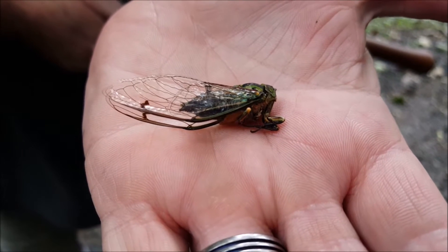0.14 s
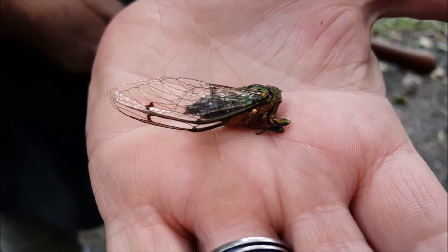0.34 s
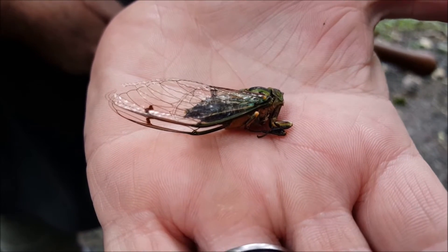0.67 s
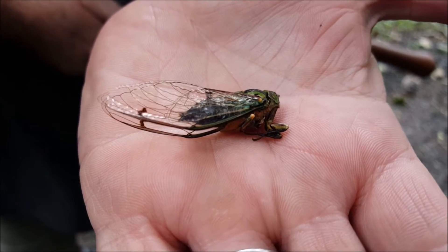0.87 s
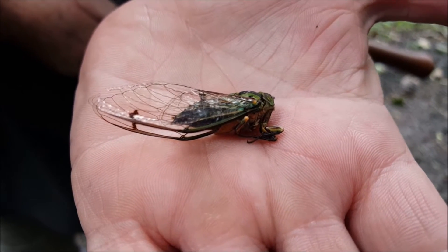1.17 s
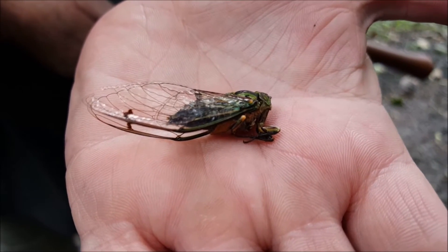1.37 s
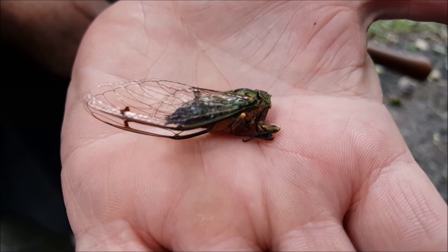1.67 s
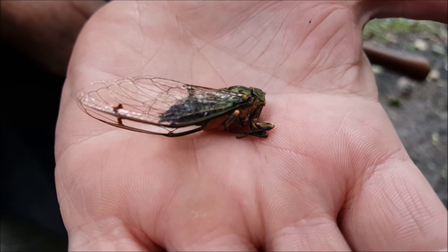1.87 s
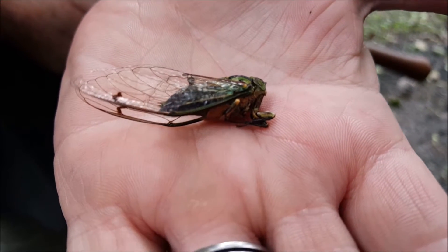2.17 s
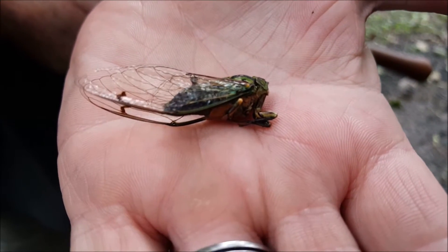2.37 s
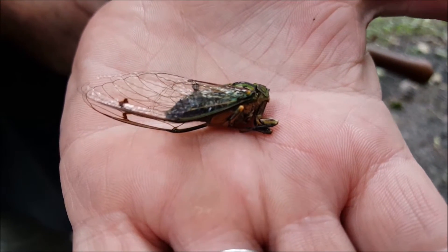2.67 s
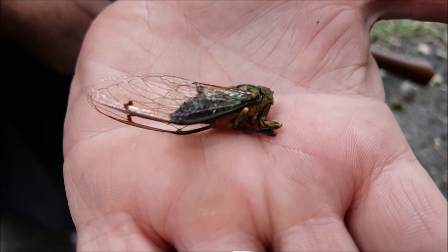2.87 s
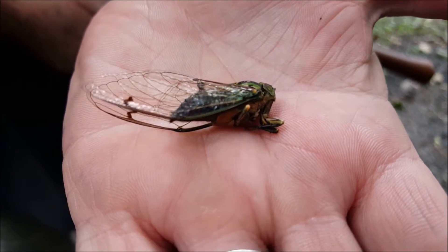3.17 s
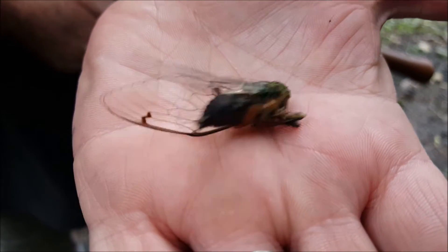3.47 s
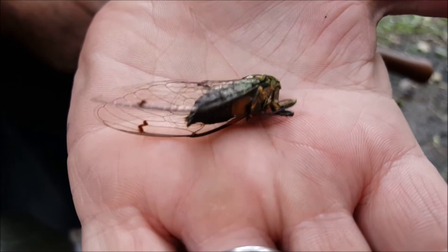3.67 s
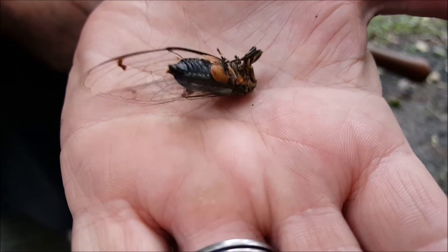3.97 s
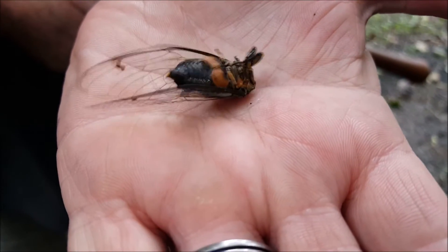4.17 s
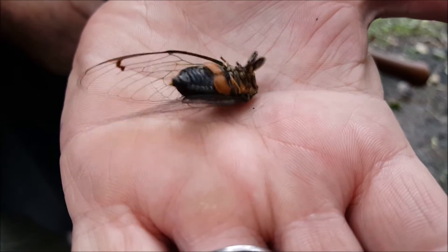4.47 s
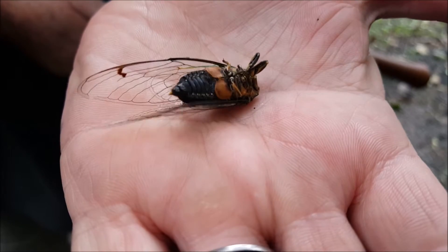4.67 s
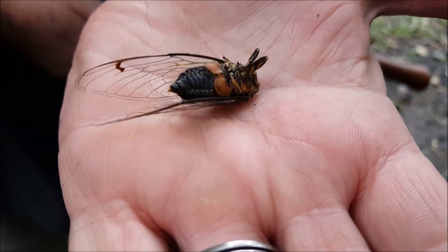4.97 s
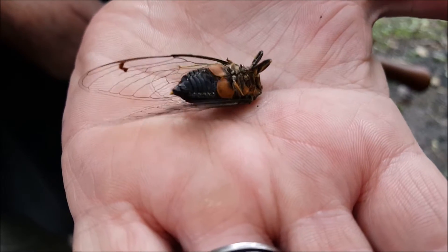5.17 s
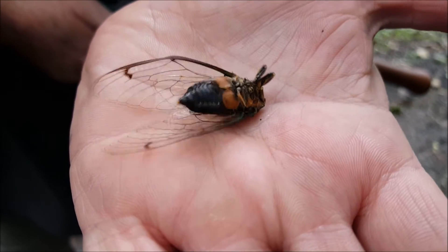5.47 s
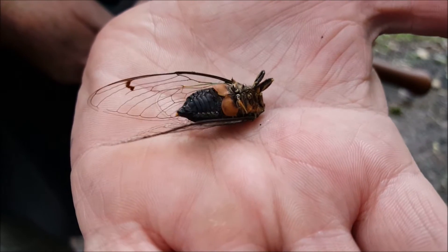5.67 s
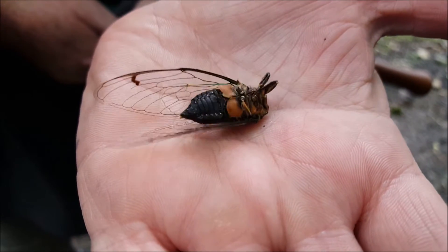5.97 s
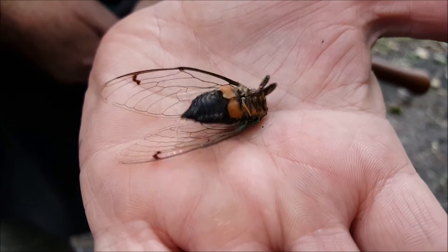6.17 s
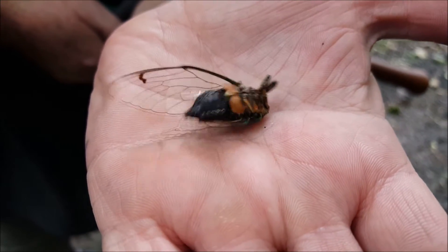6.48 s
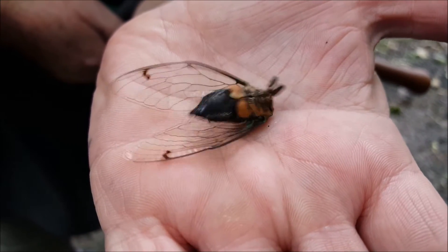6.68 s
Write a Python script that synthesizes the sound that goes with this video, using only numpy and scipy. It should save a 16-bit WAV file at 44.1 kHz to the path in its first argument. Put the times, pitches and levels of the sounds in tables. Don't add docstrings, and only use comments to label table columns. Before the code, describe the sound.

Very close insect rattle: sharp, bright bursts of tiny snaps, steady then uneven, a half-second gap, then more bursts over faint distant rumble.

```python
import sys
import numpy as np
from scipy import signal
from scipy.fft import rfft, irfft
from scipy.io import wavfile
from scipy.ndimage import uniform_filter1d

SR = 44100
rng = np.random.default_rng(int(sys.argv[2]) if len(sys.argv) > 2 else 0)


def materialize(psi):
    bounded = np.clip(np.atleast_2d(psi).T, -1, 1)
    quanta = np.round(bounded * 32767).astype(np.int16)
    wavfile.write(sys.argv[1], SR, quanta)


def how_loud(loudness_db):
    steps = np.asarray(loudness_db, float) / 20
    return 10 ** steps


N = 301644
SAMPLES_PER_MS = SR / 1000
LEAD_S = 0.05
GRAIN_CENTRE = 40

# first rib in seconds, peak of the fifth rib in dB, peak of the sixth rib in dB.
STEADY_STROKES = [(-0.03, -13, -16), (0.0779, -16, -35), (0.1839, -13, -16), (0.2938, -13, -18),
                  (0.3992, -17, -27), (0.5069, -14, -33), (0.6149, -13, -22), (0.7225, -16, -18),
                  (0.8311, -23, -21), (0.9389, -19, -28), (1.0463, -14, -22), (1.1566, -14, -30),
                  (1.2663, -14, -27), (1.375, -12, -20), (1.4837, -12, -15), (1.5895, -20, -26),
                  (1.6971, -16, -32), (1.8022, -24, -23), (1.908, -16, -32), (2.0101, -20, -27),
                  (2.1146, -12, -21), (2.2206, -22, -24), (2.3325, -19, -25), (2.4413, -21, -24),
                  (2.5504, -22, -24), (2.6604, -21, -24), (2.7682, -15, -35), (2.8777, -15, -34),
                  (2.9871, -16, -32), (3.0949, -14, -21)]
ROLLING_STROKES = [(3.1779, -18, -34), (3.2731, -11, -16), (3.3177, -12, -12), (3.351, -11, -16),
                   (3.5043, -14, -22), (3.5634, -20, -22), (3.6963, -15, -34), (3.8054, -12, -24),
                   (3.8409, -14, -13), (3.9473, -20, -43), (4.0661, -18, -35), (4.2072, -18, -38),
                   (4.2497, -15, -16), (4.3538, -17, -21), (4.4224, -26, -30), (4.4929, -23, -25),
                   (4.6031, -25, -28)]
OVERTURNED_STROKES = [(5.1201, -26, -26), (5.2617, -25, -26), (5.3861, -16, -25), (5.5082, -21, -37),
                      (5.5898, -26, -31), (5.6939, -19, -23), (5.8151, -20, -25), (5.9358, -20, -36),
                      (6.0013, -26, -30), (6.0949, -19, -29), (6.2074, -20, -35), (6.3157, -21, -32),
                      (6.4174, -16, -17), (6.5238, -18, -16), (6.6316, -26, -30), (6.7355, -17, -17),
                      (6.8392, -14, -14)]
# time in seconds, peak in dB, rib counted from 0.
SLIPPED_SNAPS = [
    (4.1146, -17.7, 0),
    (4.119, -13.4, 1),
    (4.1239, -13.4, 3),
]
# time in seconds, peak in dB.
STRAY_SNAPS = [(3.1723, -28), (3.1776, -35), (3.3406, -34), (3.3456, -31), (3.371, -32), (3.3758, -35),
               (3.8396, -23), (6.3128, -37), (6.4415, -39), (6.4488, -33), (6.548, -44), (6.5548, -38),
               (6.7578, -35)]
RIB_MS, RIB_SCATTER_MS = (0, 3.85, 7.35, 9.43, 9.43, 16.38), (0, .09, .27, .1, 0, .18)
# time in seconds, stroke drag in ms,
# then peaks of ribs 1 to 4 in dB for a fifth rib at -16 dB.
MUSCLE_STATE = [(0, 0.058, -13, -11, -15, -19), (1.2, 0.074, -14.5, -10.5, -13.5, -17),
                (2.3, 0, -14.5, -11.5, -13, -17.5), (3.5, .1, -15, -12, -18, -16),
                (4.6, 0.029, -12, -13.5, -21, -14.5), (5.3, .5, -12.5, -12, -15, -16.5),
                (5.9, 0.66, -16.5, -13, -19.5, -10), (6.2, .6, -11.5, -11.5, -19.5, -10),
                (6.84, .3, -13.5, -11.5, -13, -14)]
TIRING_SHARE = (0, 0, 0.26, 0.55)
# pitch in Hz, ring time in ms.
BODY_RINGS = [(5301, 0.37), (6170, 0.38), (7354, 0.31), (10574, 0.322), (12500, 0.091), (15700, 0.12),
              (3350, 0.11), (9050, 0.27)]
# one rib, its level in dB on each resonance.
RIB_MIX_UP = [(-6.5, -9, 3.5, -2, -8, -8.5, -11.5, -51), (-0.5, 2.5, 0.5, -4, -2, -19, -17, -31.5),
              (-3.5, -3, -4.5, -4, -10, -26, -20, -33.5), (-4, -3.5, -1, -3, -10, -8, -18.5, -29),
              (-0.5, -1.5, -23.5, -2.5, -13, -15.5, -28, -19), (-2.5, 1, -11.5, -6, -11, -24.5, -41, -11)]
# one rib, its level in dB on each resonance.
RIB_MIX_OVER = [(-6.5, -13, 4, -11, -5, -13.5, -17.5, -15.5), (-0.5, 1.5, -13, -4.5, -17, -26, -20, -12),
                (-1.5, -9.5, 7.5, -0.5, -18, -21, -10.5, -44), (0.5, 0.5, -3.5, -1, -3.5, -7, -25, -13),
                (6, -1, 3.5, -15, -14, -15, -26, -13), (1, 2, -17.5, -6.5, -8, -12, -10, -15.5)]
ROLL_S = (3.2, 4.0)
# time in seconds, share of the
ABDOMEN_STRETCH = [(0, 1.026), (2.3, 0.97), (3.0, 0.95), (4.1, 0.94), (4.6, 0.96), (6.0, 1.012), (6.4, 1.2),
                   (6.84, 1.15)]
# time in seconds, left minus right in dB for low, middle and high resonances.
AIM = [(0.0, 1.7, 2, 12), (1.85, 8.9, 4, 13), (3.98, 3.2, 3, 3.9), (6.84, 0.59, -0.5, 6.6)]
AIM_GROUP = [0, 1, 1, 2, 2, 1, 0, 1]
PHONE_SHADOW_DB = [-9, -1, -3, -3, -2.5, 3, -34, 9.5]
# pitch in Hz, left in dB, right in dB.
FOLIAGE = [(3500, 5, 1.5), (5000, 2, 2.5), (6500, -3.5, -1.5), (8450, 0, 7.5), (9300, 6.5, 1.5),
           (10700, 0, -6), (12000, 4.5, 5)]
# time in seconds, peak in dB, side (0 left, 1 right).
JOLTS = [(0.0784, -35, 0), (0.082, -29, 0), (0.3989, -24.5, 0), (0.5066, -20, 0), (0.8308, -30.5, 0),
         (0.9384, -23.5, 0), (1.0459, -18.5, 0), (1.1563, -17.5, 0), (1.266, -20.5, 0), (1.2701, -32, 0),
         (1.9077, -21.5, 0), (2.01, -25, 0), (2.5501, -27, 0), (3.8409, -32, 1), (4.4261, -15.5, 0),
         (4.4966, -21, 0), (4.6066, -15.5, 0), (5.12, -30.5, 1), (5.2659, -20, 0), (5.5079, -24, 0),
         (5.5895, -27.5, 0), (6.2072, -21.5, 0), (6.2117, -29, 0), (6.4339, -23, 0), (6.5404, -29.5, 0),
         (6.6355, -30, 0), (6.7522, -25, 1), (6.839, -20, 0)]
# time in seconds, peak in dB, pitch factor.
LEG_TICKS = [
    (1.6336, -26.5, 1),
    (5.4728, -45, 2.9),
    (5.474, -48, 3.3),
]
# pitch in Hz, ring time in ms, level in dB.
TICK_RINGS = [(2920, 0.38, 3.5), (1030, 0.56, 1), (3570, 0.3, -4), (1830, 0.75, -7)]
# time in seconds, level in dB.
TOWN_SWELL = [(0, -2.5), (.8, 1), (2.9, -2), (4.2, 1), (5.2, 3), (5.75, 1), (6.44, 9), (6.84, 9)]
# pitch in Hz, density in dB.
BACKGROUND_COLOUR = [(25, -15), (62, 4.5), (110, -0.5), (180, -0.5), (300, -9.5), (600, -13), (950, -8.5),
                     (1500, -16.5), (3000, -22), (5000, -20.5), (9500, -23), (11500, -24), (14000, -14.5),
                     (15700, -20.5)]
# time in seconds, left amount, right amount.
LOPSIDED_SWING = [(0, 0.43, 0.62), (2.2, 0.28, 0.42), (2.5, 0.52, 0.16), (3.4, 0.64, 0.62), (4.3, 0.65, 1),
                  (5.3, 0.27, 0.071), (6.0, 0.78, 0.94), (6.84, 0.62, 1)]


def cicada():
    right_lag_ms, palm_ms, palm_db = 0.2785, 0.898, -9.5
    out = np.zeros((2, N + int(LEAD_S * SR)))
    hz, ring_ms = np.array(BODY_RINGS).T[:, :, None]
    aim_s, *aim_db = np.transpose(AIM)
    snaps = stroke_snaps() + list(SLIPPED_SNAPS)
    snaps += [(s, db, -1) for s, db in STRAY_SNAPS]
    chance = rng.standard_normal(size=(len(snaps), 5, len(BODY_RINGS), 1))
    turn = (np.arange(len(BODY_RINGS))[:, None] % 2) / 2

    for (s, db, rib), (strength, slant, pitch, swing, bend) in zip(snaps, chance):
        over = np.interp(s, ROLL_S, (0, 1))
        mix_db = (1 - over) * np.array(RIB_MIX_UP[rib]) + over * np.array(RIB_MIX_OVER[rib])
        mix = how_loud(mix_db + 2.1 * strength[:, 0])
        pan_db = np.array([np.interp(s, aim_s, aim_db[group]) for group in AIM_GROUP])
        pan_db = pan_db - PHONE_SHADOW_DB + 0.55 * slant[:, 0]
        left = mix / np.sqrt(1 + how_loud(-2 * pan_db))
        right = mix / np.sqrt(1 + how_loud(2 * pan_db))

        snap_hz = hz * (1 + 0.03 * pitch)
        snap_hz[0] *= np.interp(s, *np.transpose(ABDOMEN_STRETCH))
        phase = turn + 0.13 * swing
        back = phase + 0.5 + 0.095 * bend
        near = ring(snap_hz, ring_ms, phase, 0)
        far = ring(snap_hz, ring_ms, back, right_lag_ms)
        palm = ring(snap_hz, ring_ms, back + 0.18 * swing, right_lag_ms + palm_ms)
        pair = np.array([left @ near, right @ (far + how_loud(palm_db) * palm)])
        power = uniform_filter1d(np.sum(pair ** 2, axis=0), size=12)
        peak = np.sqrt(2 * power.max())
        add(out, s + LEAD_S - 0.00015, how_loud(db + 0.42) * pair / peak)

    out[1] += how_loud(-16.5) * signal.lfilter(*signal.iirpeak(6650, 3.5, fs=SR), out[1])
    return out


def stroke_snaps():
    strokes = np.array(STEADY_STROKES + ROLLING_STROKES + OVERTURNED_STROKES)
    start_s, fifth_db, sixth_db = strokes.T[:, :, None]
    at, *state = np.transpose(MUSCLE_STATE)
    drag_ms, *first_db = (np.interp(strokes[:, 0], at, column) for column in state)
    luck = rng.standard_normal(size=(len(strokes), 10))
    late_ms = RIB_MS + luck[:, :6] * RIB_SCATTER_MS
    late_ms = late_ms + drag_ms[:, None] * (0, 0.6, 0.4, 1, 1, 1)
    late_ms[:, 4] = late_ms[:, 3] + 1.9
    tired_db = (fifth_db + 16) * np.array(TIRING_SHARE)
    early_db = np.transpose(first_db) + tired_db + 0.6 * luck[:, 6:]
    peak_db = np.hstack([early_db, fifth_db, sixth_db])
    ribs = np.tile(np.arange(len(RIB_MS)), len(strokes))
    return list(zip((start_s + late_ms / 1000).ravel(), peak_db.ravel(), ribs))


def ring(hz, ring_ms, turn, late_ms):
    rise_ms = 0.16
    samples = np.arange(256) - GRAIN_CENTRE
    peak_ms = rise_ms * np.log(1 + 2 * ring_ms / rise_ms)
    t_ms = np.clip(samples / SAMPLES_PER_MS - late_ms + peak_ms, 0, None)
    swell = ((1 - np.exp(-t_ms / rise_ms)) / (1 - np.exp(-peak_ms / rise_ms))) ** 2
    decay = np.exp((peak_ms - t_ms) / ring_ms)
    return swell * decay * np.sin(2 * np.pi * (hz * t_ms / 1000 + turn))


def add(out, s, grain):
    i = int(round(s * SR)) - GRAIN_CENTRE
    part = grain[..., :max(out.shape[-1] - i, 0)]
    out[..., i:i + part.shape[-1]] += part


def jolts():
    out = np.zeros((2, N))
    samples = np.arange(80) - GRAIN_CENTRE
    kick = np.exp(-0.5 * (samples / (0.045 * SAMPLES_PER_MS)) ** 2)
    ways = rng.choice([-1, 1], size=len(JOLTS))
    for (s, db, side), way in zip(JOLTS, ways):
        add(out[int(side)], s, way * how_loud(db + 6.0) * kick)
    return signal.lfilter(*signal.butter(1, 200, "high", fs=SR), out)


def leg_ticks():
    scrape_db, scrape_ms = -11, 11
    out = np.zeros((2, N))
    t_ms = np.arange(SR // 20) / SAMPLES_PER_MS
    for s, db, pitch in LEG_TICKS:
        knock = sum(how_loud(mode_db) * ring(hz * pitch, ms, 0, 0) for hz, ms, mode_db in TICK_RINGS)
        add(out, s, how_loud(db + np.array([[-3], [0]])) * knock)
        scrape = np.exp(-t_ms / scrape_ms) * rng.standard_normal((2, len(t_ms)))
        add(out, s + 0.0012, how_loud(db + scrape_db) * scrape)
    return signal.sosfilt(signal.butter(6, 4030, fs=SR, output="sos"), out)


def surroundings(insect):
    t = np.arange(SR // 2) / SR
    hand = how_loud(-20) * np.exp(-t / 0.0014) * (t > 0.0006)
    late = np.clip(t - 0.012, 0, None)
    trees = how_loud(np.array([[-53], [-50]])) * (1 - np.exp(-late / 0.012)) * np.exp(-late / 0.034)
    dulled = signal.lfilter(*signal.butter(1, 10000, fs=SR), insect)
    sides = dulled * how_loud(np.array([[-5], [0.8]]))
    hz, *port_db = np.transpose(FOLIAGE)
    f = np.fft.rfftfreq(len(t), 1 / SR) + 1
    leaves = how_loud(np.array([np.interp(np.log(f), np.log(hz), db) for db in port_db]))
    noise = rng.standard_normal((2, 2, len(t)))
    echoes = hand * noise + trees * irfft(rfft(noise) * leaves, len(t))
    return sum(signal.fftconvolve(side[None], echo, axes=1) for side, echo in zip(sides, echoes))


def distant_hum():
    start_s, length_s, hz, db = 4.69, 0.21, 598, -73
    t = np.arange(N) / SR
    swell = np.sin(np.pi * np.clip((t - start_s) / length_s, 0, 1))
    level = how_loud(db + 2.5 * walk(count=30))
    wavering_hz = hz * (1 + 0.02 * walk(count=40))
    return level * swell * np.sin(2 * np.pi * np.cumsum(wavering_hz) / SR)


def background():
    f = np.fft.rfftfreq(N, 1 / SR) + 1
    colour_hz, colour_db = np.transpose(BACKGROUND_COLOUR)
    colour = how_loud(np.interp(np.log(f), np.log(colour_hz), colour_db))
    town_db = np.interp(np.arange(N) / SR, *np.transpose(TOWN_SWELL))
    rumble = 1 / (1 + (f / 400) ** 4)
    hiss = 1 / (1 + (4000 / f) ** 4)
    traffic = np.clip(1 - rumble - hiss, 0, 1)
    # band, level in dB, share of the town's swell, likeness of the sides, pan in dB, sway in dB
    layers = [(rumble, -66.5 - 1.2, 1, 0.7, 0, 2),
              (traffic, -69.5 - 1.2, 0.83, 0.4, -1, 1.5),
              (hiss, -70.5 + 1.2, 0.87, 0, -4, 0.5)]
    out = np.zeros((2, N))
    for band, db, follows, alike, pan_db, sway_db in layers:
        mid, side = irfft(rfft(rng.standard_normal((2, N))) * colour * np.sqrt(band), N)
        pair = np.sqrt(1 + alike) * mid + np.sqrt(1 - alike) * side * np.array([[1], [-1]])
        level_db = db + follows * town_db + sway_db * walk(count=6)
        out += how_loud(level_db + np.array([[pan_db], [-pan_db]]) / 2) * pair / np.std(mid)
    return out


def walk(count):
    k = SR // count
    steps = np.repeat(rng.standard_normal(N // k + 1), k)
    return 0.58 * uniform_filter1d(uniform_filter1d(steps, k), k)[:N]


def scene():
    insect = cicada()
    start = int(LEAD_S * SR)
    near = insect[:, start:] + surroundings(insect)[:, start:start + N] + jolts() + leg_ticks()
    return near + background() + distant_hum()


def roll_off(x):
    return signal.sosfilt(signal.butter(12, 17070, fs=SR, output="sos"), x)


def record(dry):
    s, *amounts = np.transpose(LOPSIDED_SWING)
    uneven = np.array([np.interp(np.arange(N) / SR, s, amount) for amount in amounts])
    knock = signal.lfilter(*signal.butter(1, (150, 1800), "band", fs=SR), uneven * dry ** 2)
    shelf = signal.ellip(5, 0.3, 20, 15850, fs=SR, output="sos")
    return roll_off(signal.sosfilt(shelf, dry - knock))


dry = scene()
out = record(dry)
materialize(out)
```